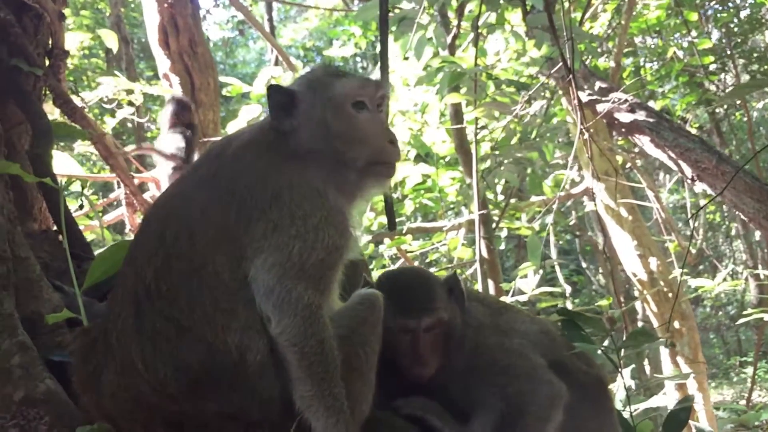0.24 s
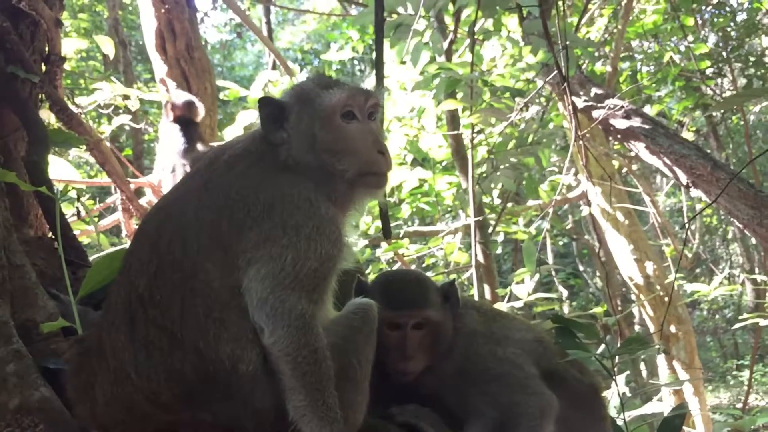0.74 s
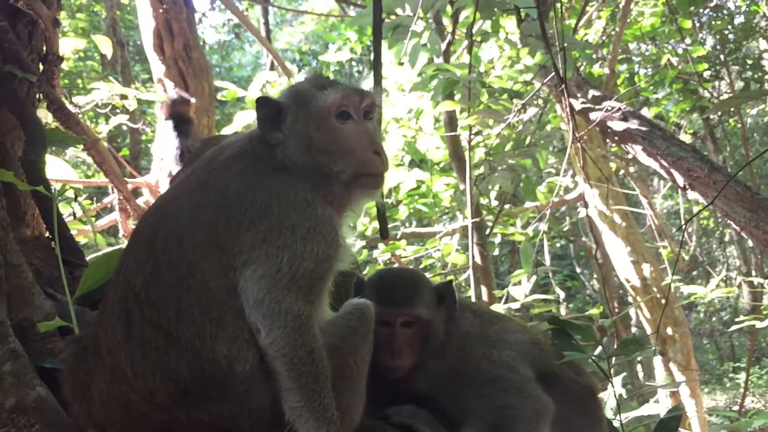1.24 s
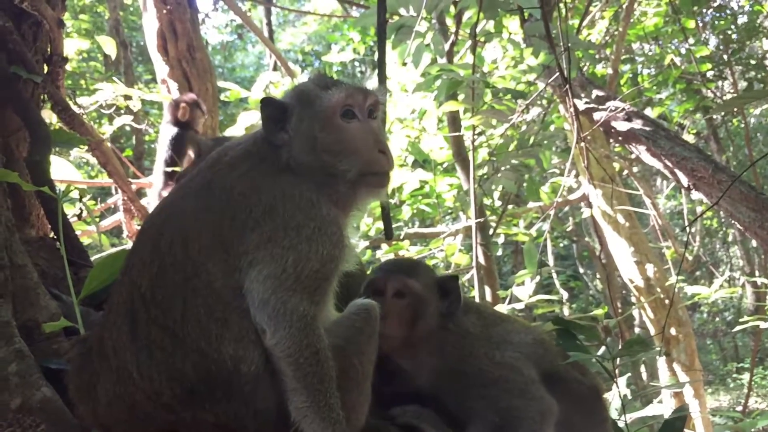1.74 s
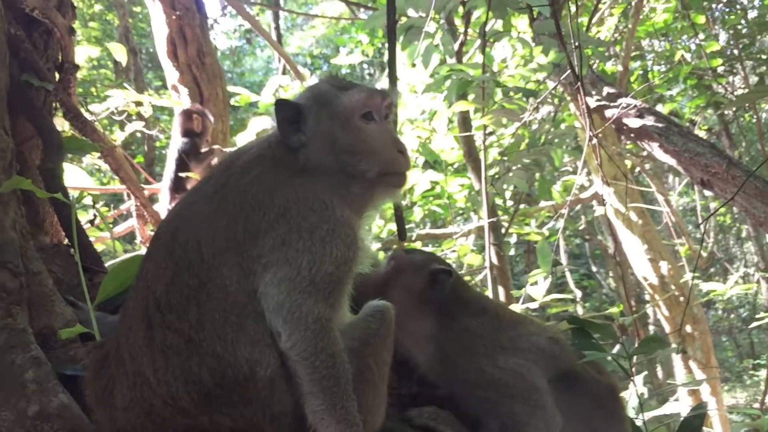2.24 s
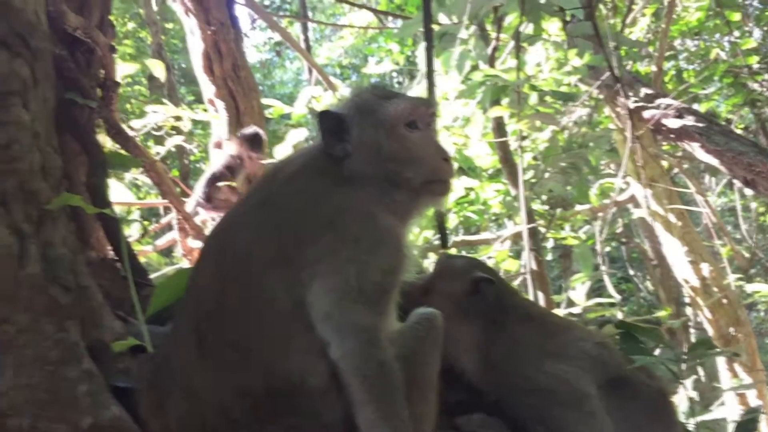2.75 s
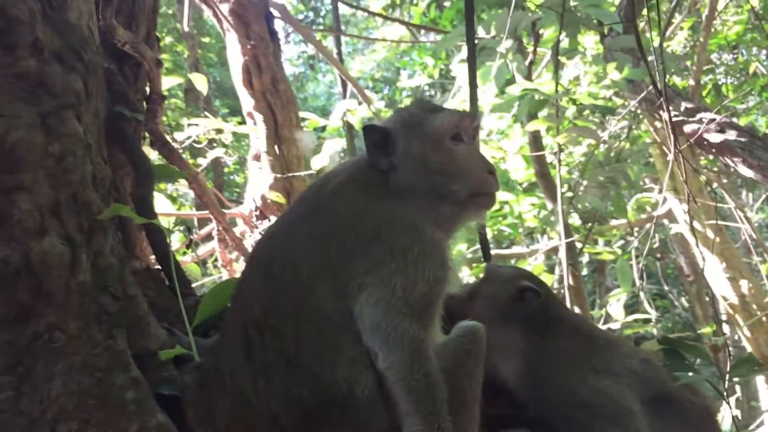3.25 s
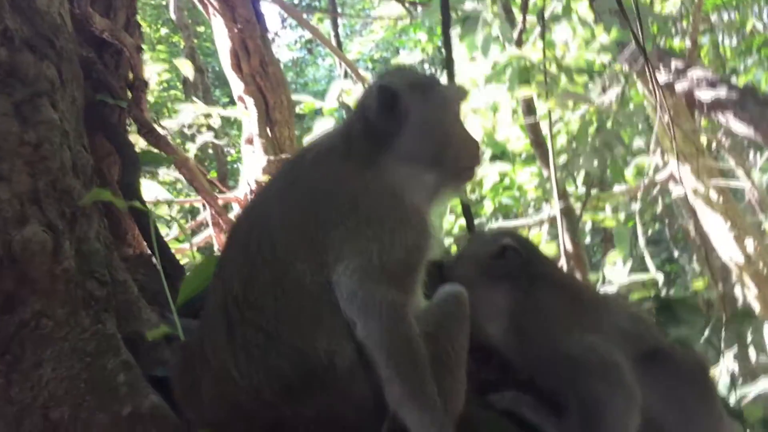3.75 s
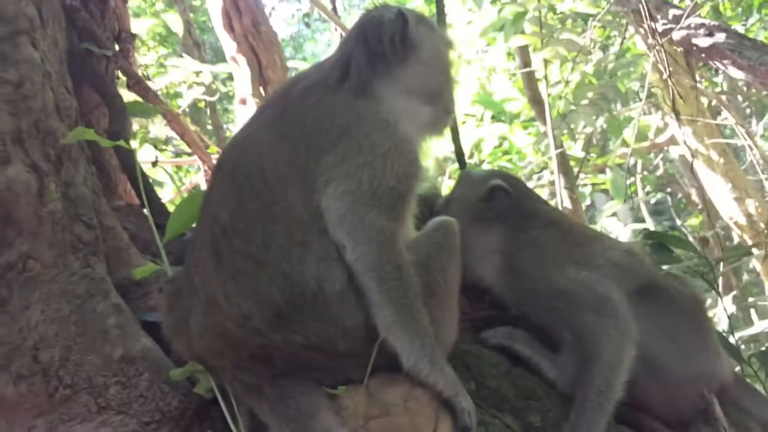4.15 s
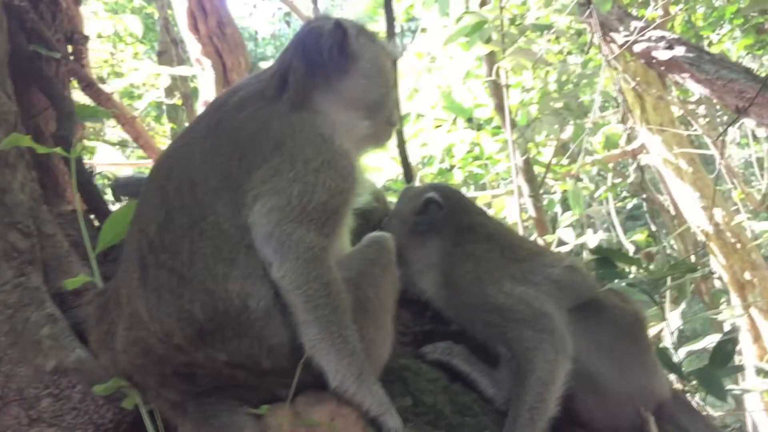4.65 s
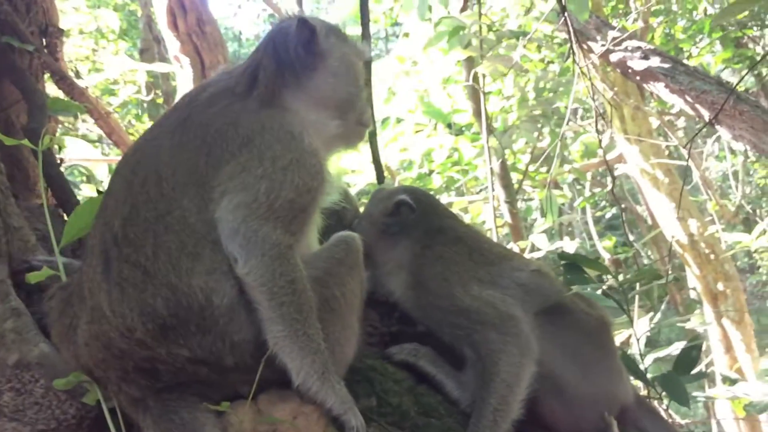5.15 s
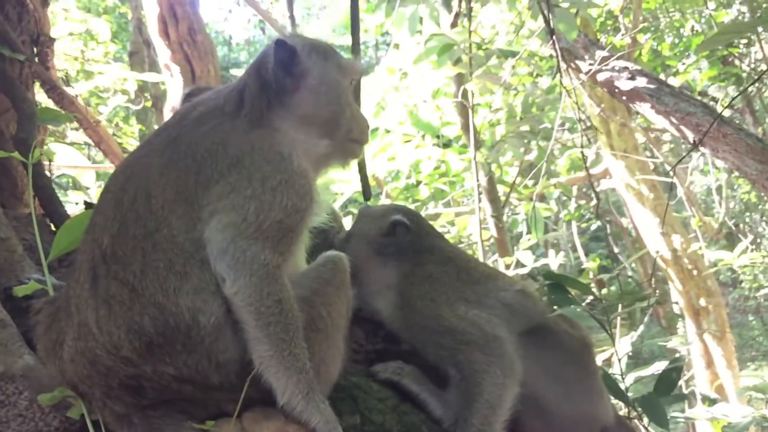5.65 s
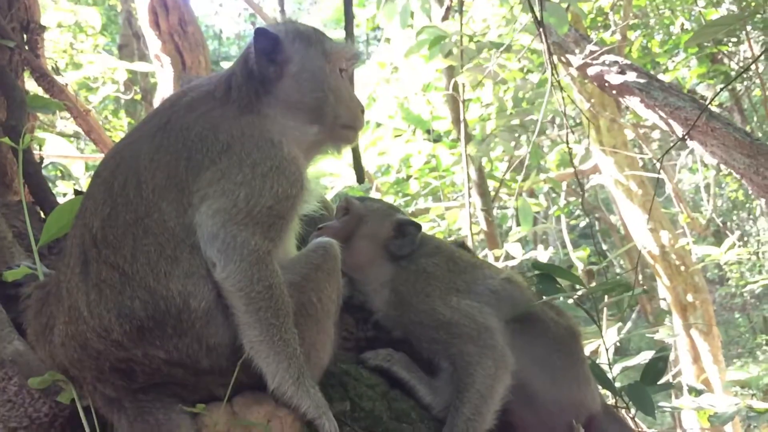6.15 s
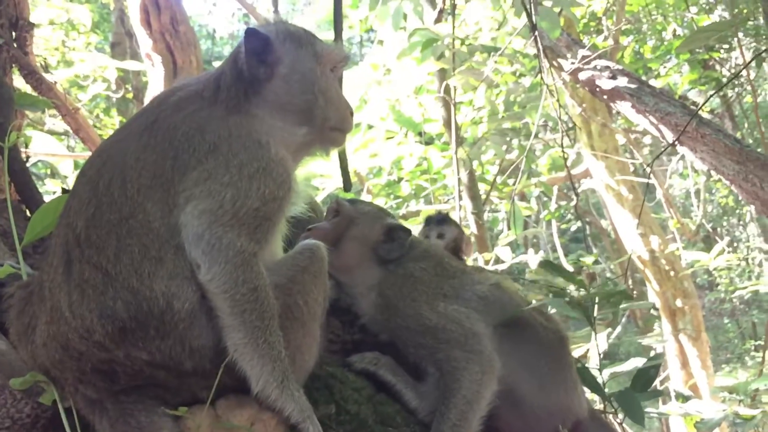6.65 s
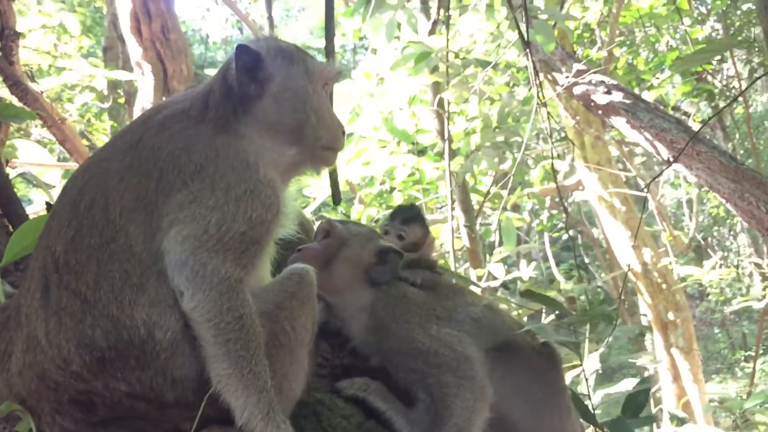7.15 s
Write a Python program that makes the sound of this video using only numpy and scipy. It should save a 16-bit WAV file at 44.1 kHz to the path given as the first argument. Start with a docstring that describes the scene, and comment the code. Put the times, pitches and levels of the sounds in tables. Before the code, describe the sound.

Steady high cricket chirping, lower crickets behind it and a faint sizzle fill an open forest with short diffuse echoes. A low lumpy rumble lies underneath. Monkeys sitting close by move on leaves and bark: early rustling, one sharp woody crack, later snaps and a dull knock, finally faint crackles and a tiny scrape. Single short bird whistles sound far off, three in all. Single-channel outdoor pickup.

```python
"""Crickets chirp near 5 kHz in front of a far chorus, over a deep rumble and a soft hiss: a tropical forest at midday.
Monkeys close by shift on dry leaves and tree bark, twigs snap and knock, and a far bird whistles three times.
Insects and bird are gliding tones, wood is damped rings with noise cracks, leaves are ringing crackles,
and the beds are shaped noise. Trunks and foliage scatter the insect chirps, whistles and close sounds."""
import sys
import numpy as np
from scipy import signal
from scipy.fft import rfft, irfft
from scipy.io import wavfile

SR = 44100
rng = np.random.default_rng(int(sys.argv[2]) if len(sys.argv) > 2 else 0)


def int16_out(signal):
    """Quantize to a 16-bit WAV file."""
    q = np.round(np.clip(np.atleast_2d(signal).T, -1, 1) * 32767)
    wavfile.write(sys.argv[1], SR, q.astype(np.int16))


def attenuation_scalar(level_db):
    """Turn a level in dB into a linear amplitude multiplier (20 dB per decade)."""
    decades = np.asarray(level_db, float) / 20
    return 10 ** decades


N = 325899   # length in samples

# Double chirps of the nearest cricket, about six a second.
# Each row: time of the strong stroke in seconds, nominal level in dB.
NEAR_CHIRPS = [(0.1236, -55), (0.2992, -52), (0.4688, -55.5), (0.6544, -57), (0.8123, -51.5), (0.9922, -49),
               (1.1505, -52), (1.3108, -52.5), (1.4805, -53), (1.6402, -51.5), (1.8243, -52), (1.9883, -53),
               (2.1682, -53), (2.3256, -51), (2.4765, -52.5), (2.6294, -47.5), (2.8006, -50), (2.9721, -54),
               (3.1387, -54), (3.3112, -54.5), (3.478, -51.5), (3.655, -50.5), (3.8343, -48.5),
               (3.9875, -50.5), (4.139, -52), (4.2955, -52), (4.4761, -46), (4.6376, -45), (4.8209, -50),
               (5.018, -50), (5.1882, -51), (5.3383, -47.5), (5.5266, -48), (5.7109, -49), (5.868, -49.5),
               (6.0382, -48), (6.1968, -49), (6.3774, -52), (6.5648, -50.5), (6.72, -50.5), (6.8844, -47.5),
               (7.0397, -51), (7.2097, -51), (7.3673, -50.5)]
# Loudest chirps of lower crickets further off.
# Each row: time of the strong stroke in seconds, nominal level in dB.
LOWER_CHIRPS = [(0.246, -52), (0.4754, -52), (0.7223, -53), (1.05, -56), (1.2307, -56), (1.7006, -53),
                (1.946, -55), (2.0385, -52.5), (2.1926, -55), (2.431, -50), (2.8477, -52), (2.8963, -54.5),
                (3.0245, -52), (3.1489, -51), (3.205, -52), (3.3655, -48), (3.6754, -51), (3.856, -53),
                (4.1609, -49.5), (4.316, -52), (4.4549, -53), (4.627, -52), (4.8338, -47), (5.0619, -58),
                (5.317, -51.5), (5.5613, -54), (5.8191, -51), (6.3805, -53), (6.8344, -50), (7.3227, -54)]
# Low ticks of a third insect. Each row: time of the strong stroke in seconds, nominal level in dB.
INSECT_TICKS = [(0.1945, -59), (0.484, -55), (0.7672, -54), (1.058, -57), (1.3503, -56), (1.623, -53.5),
                (1.9444, -54), (2.1986, -55), (2.6394, -54), (6.3435, -62), (6.6578, -57), (7.3434, -54.5)]
# Leaves and fur on bark, one movement a row. Each row: time of the peak in seconds, level of the bright part
# in dB, seconds to rise 20 dB, seconds to fall 20 dB, duller part in dB against the bright one.
MOVEMENTS = [(0.12, -75, .02, .3, 3), (0.16, -78, .05, .1, 13), (0.24, -70, .3, .3, 5),
             (0.328, -64, .05, .09, -1), (0.545, -67, .12, .05, 3), (0.569, -54.5, .014, .22, 2),
             (0.728, -64, .1, .17, 6.5), (0.85, -75.5, .2, .45, 7), (1.44, -78, .02, .2, 4),
             (1.615, -84, .03, .05, 14), (1.87, -77, .2, .15, 6), (1.976, -53.5, .006, .035, 5),
             (2.05, -78, .05, 1.0, 8), (2.556, -76, .1, .1, 6), (3.046, -73, .08, .04, 3),
             (3.175, -70, .015, .05, 6), (3.19, -59.5, .006, .06, 3), (3.51, -75, .05, .05, 7),
             (3.64, -63, .045, .3, -6), (3.735, -62, .2, .035, 1), (3.93, -78, .04, .08, 0),
             (3.975, -66.5, .035, .06, -1), (4.19, -74, .015, .06, 8), (4.365, -78, .02, .04, 7),
             (4.64, -76, .02, .05, 0), (4.71, -73, .1, .07, 4), (4.832, -74, .03, .08, 1),
             (6.57, -69, .04, .07, 0), (7.065, -71, .04, .15, 6), (7.105, -74, .05, .05, 1),
             (7.276, -74, .02, .03, 6)]
# Tilt of the bright leaf crackle. Each row: frequency in Hz, density in dB per Hz.
LEAF_SPECTRUM = [(800, -7), (2000, -20), (4000, -2.5), (6000, 3.5), (9000, -2.5), (12000, -6),
                 (15500, -11.5)]
# Tilt of the duller part, a body pressing on the leaves. Each row: frequency in Hz, density in dB per Hz.
BODY_SPECTRUM = [(400, -11), (900, -8), (1500, -2), (2500, 0.5), (4000, -2), (7000, -21.5)]
# Snaps and knocks of wood. Each row: time in seconds, nominal ring level in dB, ring pitch in Hz,
# nominal t60 of the ring in seconds, rasp in dB against the ring, nominal crack level in dB.
WOOD_SNAPS = [(0.108, -68, 2280, 0.03, -9, -66), (0.564, -53, 1850, 0.03, -5, -61),
              (1.9706, -28, 1370, 0.011, -10, -48), (3.149, -55.5, 380, 0.09, -10, -72),
              (3.1865, -49, 3170, 0.02, -6, -45.5), (3.494, -58.5, 404, 0.044, -2, -70),
              (3.585, -57.5, 2640, 0.033, -9, -75), (3.694, -51.5, 1630, 0.017, -7, -61),
              (3.7705, -39.5, 538, 0.023, -12, -76), (4.184, -55, 2990, 0.023, 2, -67),
              (4.356, -63, 2310, 0.027, 3, -69), (4.566, -57.5, 1310, 0.016, 1, -69),
              (6.396, -62, 2940, 0.03, -6, -80), (6.546, -63, 2820, 0.036, 0, -65)]
# Partials of ringing wood. Each row: ratio to the ring pitch, level in dB.
WOOD_PARTIALS = [(1.0, 5.5), (1.249, -3), (2.0, -9), (2.4, -13)]
# Dry leaves breaking. Each row: time in seconds, nominal level in dB before a trim.
LEAF_BREAKS = [(0.3055, -53), (0.5077, -54), (1.4406, -59), (1.7903, -67), (3.1303, -53), (3.9634, -55),
               (4.8264, -67), (5.279, -59.5), (5.8536, -62), (5.8844, -67), (6.5625, -55), (6.5994, -60),
               (7.0044, -64), (7.2714, -62)]
# A claw on bark. The one row: start in seconds, length in seconds, ring pitch in Hz, nominal level in dB.
CLAW_SCRAPE = (7.045, 0.065, 2300, -63)
# Whistles of the far bird. Each row: start in seconds, level in dB around which it flutters.
WHISTLES = [(3.255, -69.5), (5.015, -68.5), (7.035, -68.5)]
# Swell of the far cricket chorus, before its tail. Each row: time in seconds, level in dB.
CHORUS_SWELL = [(0.0, -71), (0.4, -73), (1.1, -71), (1.55, -72), (2.0, -69.5), (2.5, -75), (3.3, -70),
                (3.7, -76), (4.2, -70), (5.5, -78), (6.2, -72), (6.95, -68.5), (7.39, -71)]
# Swell of the rumble. Each row: time in seconds, level in dB around which it sways.
RUMBLE_SWELL = [(0.0, -49), (0.7, -49.5), (1.3, -50), (1.6, -51.5), (2.1, -52), (2.5, -49.5), (3.9, -49),
                (4.4, -51), (5.2, -48.5), (6.5, -50.5), (6.95, -48), (7.39, -49.5)]
# Tilt of the rumble ahead of its low cut. Each row: frequency in Hz, density in dB per Hz.
RUMBLE_SPECTRUM = [(15, -45), (25, -11), (59, 3), (80, 3), (97, 1.5), (138, -4), (235, -22.5), (400, -31),
                   (520, -47), (880, -120)]
# Tilt of the forest hiss. Each row: frequency in Hz, density in dB per Hz.
HISS_SPECTRUM = [(150, -31), (250, -2), (475, -7.5), (546, -5), (759, -8.5), (887, -8), (3680, -14),
                 (4860, -14.5), (5390, -15.5), (5880, -15.5), (7490, -21), (8460, -20), (10400, -24),
                 (14700, -26.5), (15800, -28)]


def rms_one(x):
    """Scale to unit power."""
    return x / np.sqrt(np.mean(x ** 2) + 1e-20)


def swell(rows):
    """Join (seconds, dB) points by straight lines at every sample."""
    s, db = np.transpose(rows)
    return np.interp(np.arange(N) / SR, s, db)


def drift(rate_hz):
    """Low-passed noise of unit spread, computed every 40 samples and joined by straight lines."""
    r = np.exp(-80 * np.pi * rate_hz / SR)
    noise = rng.standard_normal(N // 40 + 2002)
    slow = signal.lfilter([1], [1, -2 * r, r * r], noise)[2000:]   # leave out the filter's run-in
    return np.interp(np.arange(N) / 40, np.arange(len(slow)), rms_one(slow))


def coloured(x, spectrum):
    """Tilt a sound by a (Hz, dB) spectrum, straight on a log frequency axis."""
    hz, db = np.transpose(spectrum)
    bins = np.maximum(np.fft.rfftfreq(N, 1 / SR), 1)
    gain_db = np.interp(np.log(bins), np.log(hz), db)
    return irfft(rfft(x) * attenuation_scalar(gain_db), N)


def band(x, low_hz, high_hz):
    """Causal band-pass."""
    return signal.sosfilt(signal.butter(2, [low_hz, high_hz], "band", fs=SR, output="sos"), x)


def add(out, s, piece):
    """Lay a short sound into out at time s."""
    at = max(round(s * SR), 0)
    out[at:at + len(piece)] += piece[:max(N - at, 0)]


def unit_time(length_s):
    """Ramp from 0 to 1 over a short sound."""
    return np.arange(int(length_s * SR)) / (length_s * SR)


def wing_stroke(hz, length_s, fall):
    """The scraper runs down the file and slows: a tone that falls in pitch and trails off."""
    u = unit_time(length_s)
    pitch = hz * (1 + fall * (.35 - u ** 0.984))
    phase = 2 * np.pi * np.cumsum(pitch) / SR
    teeth = 1 + .22 * np.interp(u, np.linspace(0, 1, 9), rng.standard_normal(9))   # uneven teeth
    envelope = np.sin(np.pi * u ** .5) ** 2
    return teeth * envelope * np.sin(phase)


def crickets(chirps, hz, hz_spread, length_s, fall, lead_s, lead_db):
    """Each chirp is a short weak stroke followed by a full one; no two strokes are quite alike."""
    out = np.zeros(N)
    chance = rng.normal(0, 1, (len(chirps), 6))
    for (s, db), (later, longer, wider, higher, shifted, harder) in zip(chirps, chance):
        pitch = hz + hz_spread * shifted
        strong = wing_stroke(pitch, length_s * (1 + 0.061 * longer), fall * (1 + 0.17 * wider))
        add(out, s - .001, attenuation_scalar(db) * strong)
        weak = wing_stroke(pitch * (.98 + .012 * higher), .55 * length_s, fall)
        weak_level = attenuation_scalar(db + lead_db + 3.0 * harder)
        add(out, s - .001 - lead_s + 0.0008 * later, weak_level * weak)
    return out


def leaf_grain(crackles_per_s, spread_db, cycles, shortest_s):
    """Each crackle rings a few cycles at the pitch of its own scrap of leaf."""
    sizes = attenuation_scalar(spread_db * np.minimum(rng.exponential(1, N), 4)) * rng.choice([-1, 1], N)
    chance = attenuation_scalar(4.0 * drift(60)) * crackles_per_s / SR   # crackles bunch together
    clicks = sizes * (rng.random(N) < chance)
    out, scrap = np.zeros(N), rng.integers(0, 20, N)
    for k, hz in enumerate(np.geomspace(900, 15000, 20)):
        r = attenuation_scalar(-60 / ((cycles / hz + shortest_s) * SR))
        w = 2 * np.pi * hz / SR
        struck = clicks * (scrap == k) + 1e-18
        ring = signal.lfilter([1, 0, -1], [1, -2 * r * np.cos(w), r * r], struck)
        out += np.sqrt(hz) * rms_one(ring)
    return rms_one(out)


def rustle(smooth_share):
    """Dense crackles of dry leaves on a smooth rubbing noise; a body pressing on them adds a duller part."""
    grain = leaf_grain(crackles_per_s=3000, spread_db=3.5, cycles=17, shortest_s=0.003)
    grain = grain + smooth_share * rng.standard_normal(N)
    bright = coloured(grain, LEAF_SPECTRUM)
    bright = bright / np.std(band(bright, 6500, 15000))   # levels refer to this treble band
    body = rms_one(coloured(grain, BODY_SPECTRUM))
    bright_power, body_power, t = 0, 0, np.arange(N) / SR
    for s, db, rise_s, fall_s, body_db in MOVEMENTS:
        away = np.maximum((s - t) / rise_s, (t - s) / fall_s)
        power = attenuation_scalar(2 * (db - 20 * away))
        bright_power = bright_power + power
        body_power = body_power + power * attenuation_scalar(2 * body_db)
    bright = attenuation_scalar(1.5 * drift(40)) * np.sqrt(bright_power) * bright
    return bright + attenuation_scalar(1.5 * drift(52)) * np.sqrt(body_power) * body


def snaps():
    """A damped wooden ring that rebounds once, a rasp around it, and a broad crack of splitting fibres."""
    ring_delay_s, rebound_s = .0012, 0.00405   # the fibres tick before the wood swings
    out, t = np.zeros(N), np.arange(int(.1 * SR)) / SR
    splinters = rng.standard_normal((len(WOOD_SNAPS), 2, len(t)))
    for (s, db, hz, t60, rasp_db, crack_db), (rasp, noise) in zip(WOOD_SNAPS, splinters):
        ring = sum(attenuation_scalar(mode_db) * np.sin(2 * np.pi * ratio * hz * t) for ratio, mode_db in WOOD_PARTIALS)
        ring = attenuation_scalar(-60 * t / max(t60, .006)) * (1 - np.exp(-t / 0.00084)) * ring
        add(out, s + ring_delay_s, attenuation_scalar(db) * ring)
        add(out, s + ring_delay_s + rebound_s, attenuation_scalar(db - 13) * ring)
        rasp = rms_one(band(rasp, 0.6 * hz, 2.86 * hz))
        rasp_envelope = attenuation_scalar(db + rasp_db - 60 * t / (2.4 * t60)) * (1 - np.exp(-t / 0.0015))
        add(out, s, rasp_envelope * rasp)
        add(out, s, attenuation_scalar(crack_db - 60 * t / 0.022) * band(noise, 1700, 15500))
    return out


def leaf_ticks():
    """A dry leaf breaks: a thin bright tick of fast-dying noise."""
    out, t = np.zeros(N), np.arange(int(0.057 * SR)) / SR
    for (s, db), noise in zip(LEAF_BREAKS, rng.standard_normal((len(LEAF_BREAKS), len(t)))):
        add(out, s, attenuation_scalar(db - 3.5 - 60 * t / 0.044) * band(noise, 4000, 13000))
    return out


def scrape():
    """A claw slips over bark in quick uneven steps, heard through one hollow resonance."""
    s, length_s, hz, db = CLAW_SCRAPE
    u = unit_time(length_s)
    slips = rng.standard_normal(len(u)) * attenuation_scalar(3.0 * drift(120)[:len(u)])
    hollow = rms_one(band(slips, .88 * hz, 1.08 * hz))
    out = np.zeros(N)
    add(out, s, attenuation_scalar(db) * np.sin(np.pi * u ** .5) * hollow)
    return out


def bird():
    """Near sines with soft ends and a slight flutter, falling faster towards the end of each whistle."""
    start_hz, end_hz, note_s = 3490, 3170, .072
    out, u = np.zeros(N), unit_time(note_s)
    pitch = start_hz + (end_hz - start_hz) * u ** 1.6
    tone = np.sin(2 * np.pi * np.cumsum(pitch) / SR)
    for s, db in WHISTLES:
        add(out, s, attenuation_scalar(db) * signal.windows.tukey(len(u), .4) * tone)
    return out * attenuation_scalar(2.5 * drift(60))


def far_chorus(per_s, centre_hz, spread):
    """Many distant crickets stroke at unrelated moments and pitches."""
    out, draws = np.zeros(N), rng.random((2500, 3))
    starts = np.cumsum(-np.log(1 - draws[:, 0])) / per_s
    for s, (_, pitch, size) in zip(starts[starts < N / SR], draws):
        hz = centre_hz * (1 + spread * (pitch ** 1.3 - .35))
        add(out, s, attenuation_scalar(12.0 * size) * wing_stroke(hz, 0.0098, 0.096))
    return attenuation_scalar(swell(CHORUS_SWELL)) * rms_one(out)


def high_insects(db):
    """A faint far sizzle of small katydids between 8 and 10 kHz: band-passed noise that wavers."""
    sizzle = band(band(rng.standard_normal(N), 7900, 9300), 7900, 9300)
    return attenuation_scalar(db + 2.0 * drift(9)) * rms_one(sizzle)


def rumble():
    """Lumpy far rumble: deep shaped noise that sways in level."""
    deep = coloured(rng.standard_normal(N), RUMBLE_SPECTRUM)
    deep = signal.sosfilt(signal.butter(4, 40, "high", fs=SR, output="sos"), deep)
    upper = band(deep, 107, 270)
    deep += (attenuation_scalar(2.87 * drift(7.8)) - 1) * upper   # the upper rumble comes in lumps of its own
    return attenuation_scalar(swell(RUMBLE_SWELL) + 1.21 * drift(5.6)) * rms_one(deep)


def hiss(db):
    """An even forest hiss: shaped noise with a slight waver, its level set between 300 and 4000 Hz."""
    noise = coloured(rng.standard_normal(N), HISS_SPECTRUM)
    noise = noise / np.std(band(noise, 300, 4000))
    return attenuation_scalar(db + .5 * drift(3)) * noise


def forest(x, t60, gap_s):
    """Scattering by trunks and leaves: a cloud of weak echoes that gathers after a gap and dies away."""
    t = np.arange(int(.6 * SR)) / SR
    trunks = attenuation_scalar(1.5 * drift(100)[:len(t)])   # uneven strength of the echoes
    envelope = attenuation_scalar(-60 * t / t60) * (1 - np.exp(-t / gap_s))
    echoes = rng.standard_normal(len(t)) * trunks * envelope
    return signal.fftconvolve(x, echoes / np.sqrt(np.sum(echoes ** 2)))[:N]


def scene():
    """Far sources carry more of the forest's tail than near ones; each place has its own echoes."""
    near = crickets(NEAR_CHIRPS, hz=5070, hz_spread=40, length_s=0.0137, fall=0.29, lead_s=.0125, lead_db=-5.5)
    lower = crickets(LOWER_CHIRPS, hz=4750, hz_spread=80, length_s=0.011, fall=0.16, lead_s=.0145, lead_db=-6)
    ticks = crickets(INSECT_TICKS, hz=4120, hz_spread=40, length_s=0.011, fall=0.09, lead_s=0.019, lead_db=-12)
    close = rustle(smooth_share=1.1) + snaps() + leaf_ticks() + scrape()
    whistle = bird()
    chorus = far_chorus(per_s=100, centre_hz=4730, spread=0.13)
    out = near + attenuation_scalar(-4) * forest(near, t60=0.15, gap_s=0.004)
    out += lower + ticks + attenuation_scalar(-0.5) * forest(lower + attenuation_scalar(-5.5) * ticks, t60=0.28, gap_s=0.0041)
    out += close + attenuation_scalar(-14) * forest(close, t60=0.18, gap_s=0.0075)
    out += whistle + attenuation_scalar(-0.5) * forest(whistle, t60=0.7, gap_s=0.011)
    out += chorus + attenuation_scalar(1.5) * forest(chorus, t60=0.31, gap_s=.008)
    out += high_insects(db=-86.5) + rumble() + hiss(db=-69.5)
    return out[None]   # one channel


def top_cut(x):
    """Nothing passes above the cut-off."""
    return signal.sosfilt(signal.butter(12, 15750, fs=SR, output="sos"), x)


def record(dry):
    """Turn the finished mix into the sound that is written."""
    return top_cut(dry)


dry = scene()
out = record(dry)
int16_out(out)
```